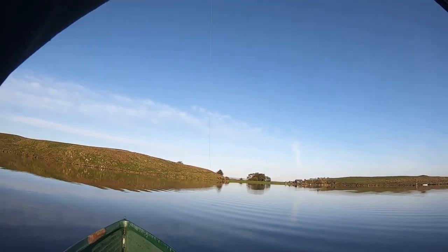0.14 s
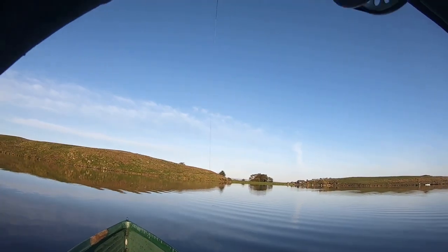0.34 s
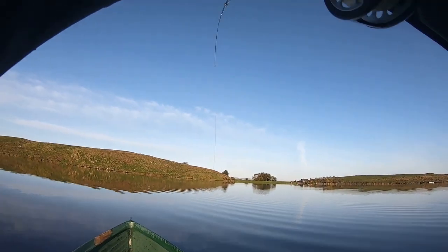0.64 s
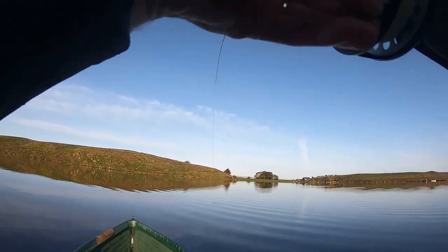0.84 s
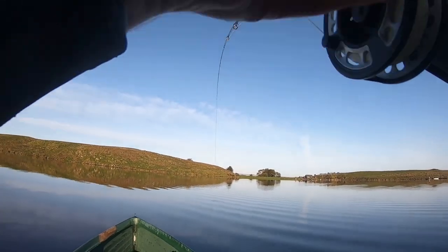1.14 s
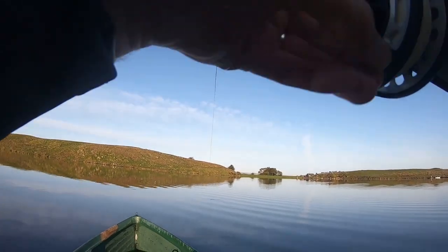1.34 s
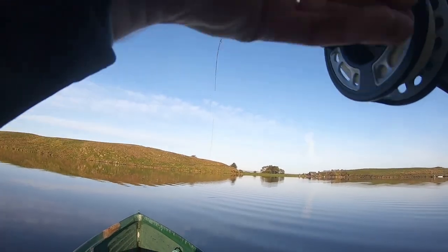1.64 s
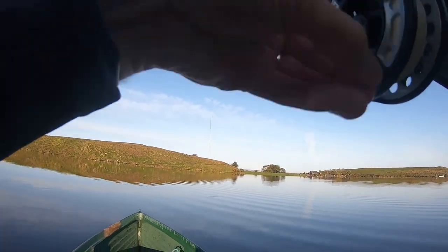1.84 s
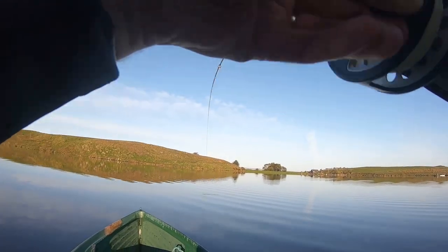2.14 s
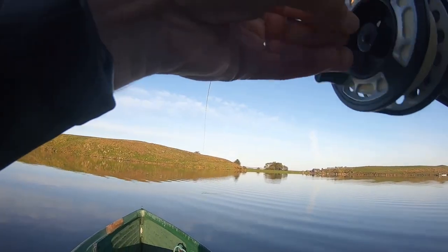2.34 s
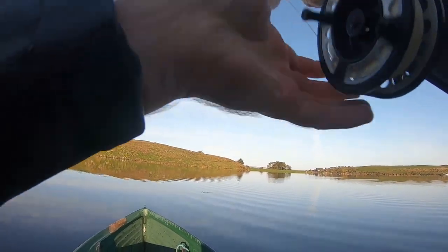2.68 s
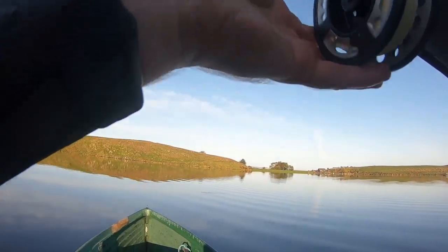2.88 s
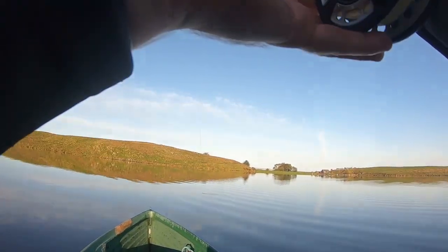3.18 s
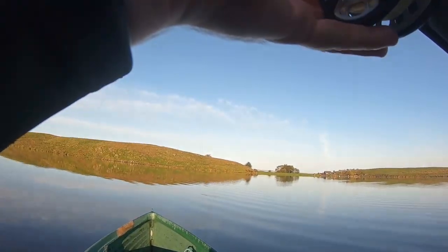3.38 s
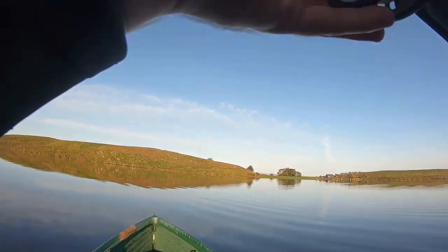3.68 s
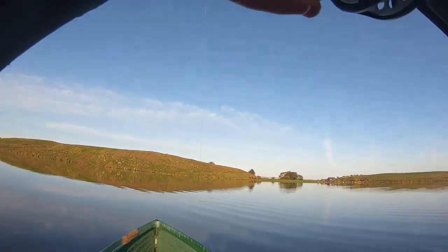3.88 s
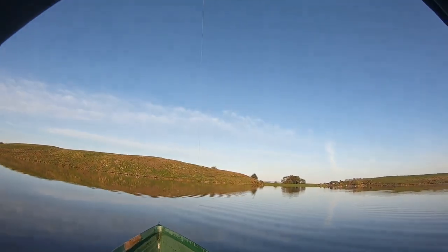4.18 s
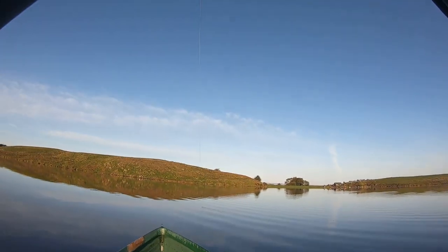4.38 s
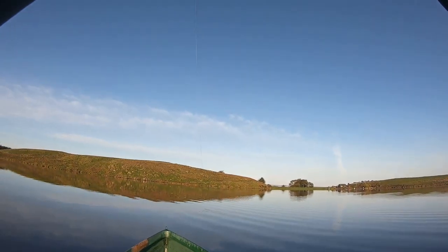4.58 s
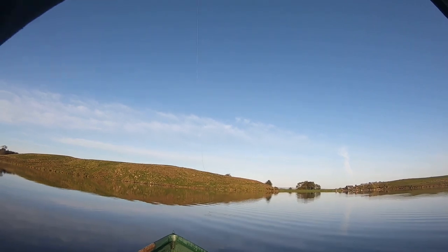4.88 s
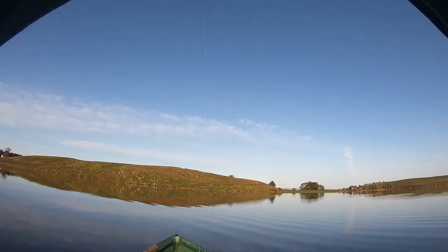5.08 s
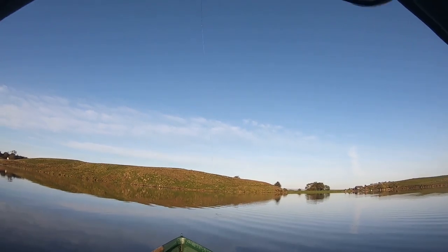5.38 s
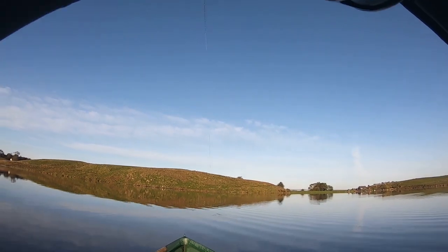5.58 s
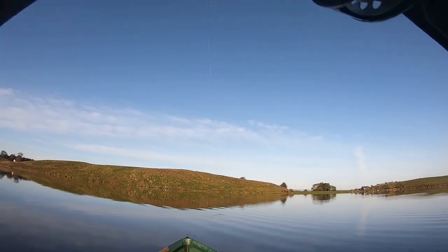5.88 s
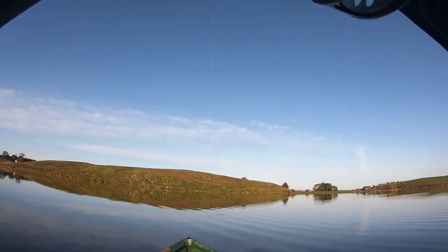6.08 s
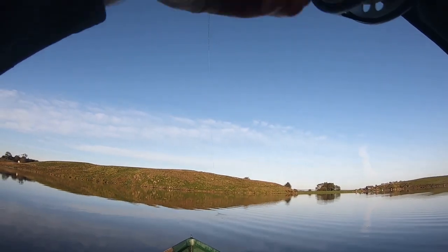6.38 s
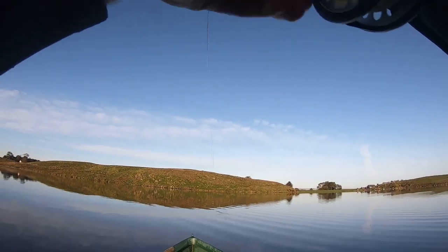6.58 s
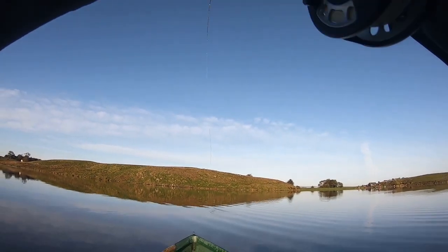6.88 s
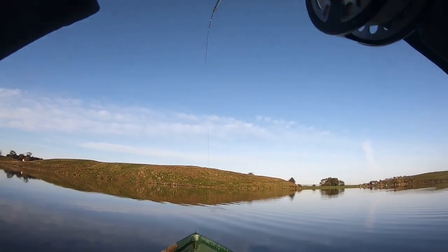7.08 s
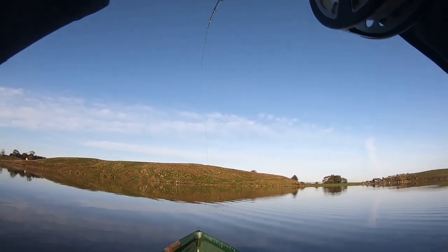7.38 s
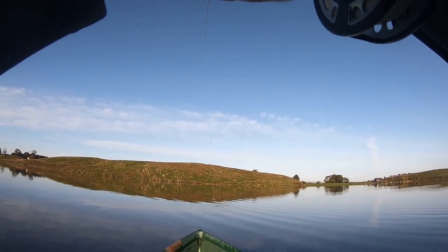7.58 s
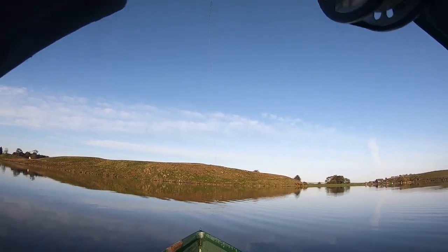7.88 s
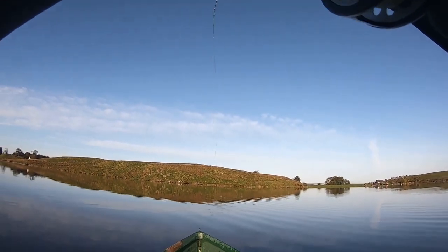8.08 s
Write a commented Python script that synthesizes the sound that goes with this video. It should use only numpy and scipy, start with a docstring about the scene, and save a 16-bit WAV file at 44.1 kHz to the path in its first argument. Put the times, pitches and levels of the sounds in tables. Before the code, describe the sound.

Close up, a fly reel's metallic ratchet clicks in quick pulsing turns, whirrs briefly, pauses, then winds again over a quiet lake with soft boat bumps.

```python
"""Over the quiet of a calm lake, a sleeve rustles and a click-and-pawl fly reel starts, close to the microphone.
It is wound in a small boat in spells of four or five turns a second, each turn running slack once.
Each tooth rings the pawl spring and sets the spool chattering; metal cracks and stray ticks fall between.
After the first spell the spool spins so fast that the clicks fuse into a whirr. The loose handle ticks,
the hull gives soft bumps of low, damped noise, and two faint gliding chirps come from far off."""
import sys
import numpy as np
from scipy import signal
from scipy.io import wavfile

SR = 44100
rng = np.random.default_rng(int(sys.argv[2]) if len(sys.argv) > 2 else 0)


def to_wav(sig):
    """Store sig (one row per channel, or 1-D mono) as 16-bit WAV at the path in sys.argv[1].

    Samples outside -1..1 are clipped; the rate is SR.
    """
    pcm = np.clip(np.atleast_2d(sig), -1, 1) * 32767
    pcm = np.round(pcm).astype(np.int16)
    wavfile.write(sys.argv[1], SR, pcm.T)  # frames by channels


N = 362943
TIME = np.arange(N) / SR
CUTOFF_HZ = 16000  # upper end of the recorded band
CLICK_S = .007  # span over which click levels are reckoned
SPRING_HZ = 3600  # nominal pitch of the pawl spring
# How alike left and right are at the microphone. Each row: frequency in Hz, likeness (1 same, 0 unrelated).
LEFT_RIGHT_LIKENESS = [(200, 0.76), (700, 0.2), (2200, 0.45), (3700, 0.53), (5500, 0.45), (9000, -0.2)]


def from_db(db):
    """Decibels to gain."""
    return 10 ** (np.asarray(db) / 20)


def rms_one(x):
    """Scale to rms 1."""
    return x / np.sqrt(np.mean(x ** 2) + 1e-20)


def unit_energy(x):
    """Scale to energy 1."""
    return x / np.sqrt(np.sum(x ** 2) + 1e-20)


def in_time(rows):
    """The columns of a curve at every sample."""
    s, *columns = np.transpose(rows)
    return [np.interp(TIME, s, c) for c in columns]


def at_hz(points, hz):
    """Read a spectrum on a log-frequency axis."""
    point_hz, values = np.transpose(points)
    return np.interp(np.log(hz), np.log(point_hz), values)


def add(out, s, sound):
    """Mix a short sound in at time s."""
    start = int(np.clip(round(s * SR), 0, N - 1))
    out[..., start:start + sound.shape[-1]] += sound[..., :N - start]


def high_pass(x, hz):
    """Take away the bass below hz."""
    return signal.sosfilt(signal.butter(2, hz, "high", fs=SR, output="sos"), x)


def drift(rate):
    """A slow random wander through `rate` chance values a second."""
    knots = rng.standard_normal(2000)
    return np.interp(TIME * rate, np.arange(len(knots)), knots)


def resonate(x, hz, width_hz):
    """A resonance with gain 1 on top."""
    r = np.exp(-np.pi * width_hz / SR)
    feed = np.array([1, 0, -1]) * (1 - r * r) / 2
    feedback = [1, -2 * r * np.cos(2 * np.pi * hz / SR), r * r]
    return signal.lfilter(feed, feedback, x + 1e-18)


def stereo(mid, side, likeness):
    """Two unrelated signals to left and right of a given likeness."""
    c = np.clip(likeness, -1, 1)
    return np.sqrt(1 + c) * mid + np.sqrt(1 - c) * side * np.array([[1], [-1]])


def banded_noise(spectrum, patchy_db, flicker_rate):
    """Half-octave bands of stereo noise, each flickering on its own; rms 1."""
    out, white = 0, rng.standard_normal((2, 2, N))
    top_hz = min(spectrum[-1][0], CUTOFF_HZ)
    edges = 2 ** np.arange(np.log2(spectrum[0][0]), np.log2(top_hz) + 1 / 4, .5)
    for k, (low, high) in enumerate(zip(edges, edges[1:])):
        band = signal.butter(2, [low, high], "band", fs=SR, output="sos")
        mid, side = signal.sosfilt(band, white[k % 2])
        hz = np.sqrt(low * high)
        level = from_db(at_hz(spectrum, hz) + patchy_db * drift(flicker_rate))
        out = out + level * stereo(mid, side, at_hz(LEFT_RIGHT_LIKENESS, hz))
    return rms_one(out)


def lake():
    """Water and air around the hull: low noise whose bands flicker."""
    # Each row: start in seconds, level in dB before a common gain.
    lake_level = [(0.0, -61), (3.92, -65.5), (5.82, -60), (8.23, -66)]
    # Each row: frequency in Hz, level in dB per Hz before scaling.
    lake_colour = [(25, -9), (110, -21), (160, -2.5), (260, -4), (600, -12.5), (1800, -19.5)]
    level_db, = in_time(lake_level)
    return from_db(level_db + 2.0) * banded_noise(lake_colour, patchy_db=4.0, flicker_rate=15)


def sleeve():
    """Sleeve and line rustle: noise whose bands flicker fast."""
    # Each row: time in seconds, level in dB before a common gain.
    rustle_level = [(0, -55), (0.25, -54), (2.27, -55.5), (3.22, -66), (3.45, -72), (3.72, -66),
                    (3.85, -57), (4.02, -59), (4.1, -54), (4.2, -70), (4.28, -54), (4.45, -60.5),
                    (4.6, -59.5), (7.45, -58.5), (7.6, -68.5), (7.8, -62.5)]
    # Each row: frequency in Hz, level in dB per Hz before scaling.
    rustle_colour = [(300, -9), (850, -4), (1500, -5), (4200, -10), (7500, -14.5), (9700, -3.5),
                     (15000, -37)]
    level_db, = in_time(rustle_level)
    return from_db(level_db + 3.0) * banded_noise(rustle_colour, patchy_db=4.5, flicker_rate=40)


def chatter(t60, bounce_db, tail_db, crack_db=0, crack_t60=0.00088, bounce_s=.0026, attack_s=.00005):
    """A contact cracks, dissolves in tiny impacts, rebounds once and leaves a faint tail; energy near 1 each way."""
    t = TIME[:SR // 25]
    late = t - bounce_s * rng.uniform(0.29, 1.5)
    rebound_db = bounce_db + 2 * rng.standard_normal() - 60 * np.abs(late) / t60
    rebound = (late > 0) * from_db(rebound_db)
    crack = from_db(crack_db - 60 * t / crack_t60)
    impacts = from_db(-60 * t / t60)
    tail = from_db(tail_db - 60 * t / .06)
    power = crack ** 2 + impacts ** 2 + rebound ** 2 + tail ** 2
    envelope = unit_energy(np.sqrt(power) * (1 - np.exp(-t / attack_s)))
    return envelope * rng.standard_normal((2, len(t)))


def spool(drive, low_cut_hz=900):
    """Spool and frame resonate under a two-way (mid, side) drive; a white drive roughly keeps its power."""
    # Each row: resonance in Hz, width in Hz, relative level in dB.
    spool_modes = [(990, 1500, -13), (1543, 54, 0), (2006, 316, -3), (3420, 1200, 2), (4496, 460, 4.5),
                   (5380, 570, 0.5), (6514, 630, 2), (7360, 660, -1.5), (8710, 340, 0.5), (9330, 470, 6.5),
                   (9640, 940, 6), (13600, 3500, -6.5)]
    out, power = 0, 0
    for k, (hz, width_hz, db) in enumerate(spool_modes):
        mid, side = resonate(drive, hz, width_hz)
        mode = stereo(mid, side, at_hz(LEFT_RIGHT_LIKENESS, hz))
        out = out + (-1) ** k * from_db(db) * mode
        power += from_db(db) ** 2 * np.pi * width_hz / SR
    # so small a body radiates little bass
    return high_pass(out, low_cut_hz) / np.sqrt(power)


def spring_ring(hz, rattle_db, rattle_t60):
    """The pawl snaps down and rattles; its spring rings a little differently on every tooth; energy 1."""
    # Each row: nominal resonance in Hz, width in Hz, relative level in dB before chance.
    spring_modes = [(2200, 300, -15.5), (2800, 500, -13), (3340, 360, -2.5), (3620, 210, 2)]
    t = TIME[:SR // 50]
    rattle = unit_energy(from_db(-60 * t / rattle_t60)) * rng.standard_normal(len(t))
    snap = signal.unit_impulse(len(t)) + from_db(rattle_db) * rattle
    stretch = hz / SPRING_HZ * (1 + .021 * np.clip(rng.standard_normal(), -2, .9))
    strengths = from_db(2 * rng.standard_normal(len(spring_modes)))
    ring = np.zeros(len(t))
    for k, (mode_hz, width_hz, db) in enumerate(spring_modes):
        ring += (-1) ** k * from_db(db) * strengths[k] * resonate(snap, mode_hz * stretch, width_hz)
    return unit_energy(ring)


def winding(teeth):
    """Each tooth scrapes under the pawl, then lets it snap down: the spring rings and the spool chatters."""
    spring_db, spool_db = 0.26, -0.74  # trims
    slide_db, slide_s = -46, 0.0042  # the scrape starts this long before the snap
    rim_hz, rim_width_hz, rim_db = 9750, 700, 4.0
    rings, drive, size = np.zeros(N), np.zeros((2, N)), np.sqrt(CLICK_S * SR)
    scrape = unit_energy(np.hanning(SR // 220))
    for s, ring_db, chatter_db, hz in teeth:
        ring = spring_ring(hz, rattle_db=-4, rattle_t60=.012)
        add(rings, s, size * from_db(ring_db + spring_db) * ring)
        burst = chatter(t60=0.013, bounce_db=-2.0, tail_db=-9.5, crack_db=0.5)
        # on a slack spool the spring barely rings and the blow sets the rim singing instead
        slack = np.clip((chatter_db - ring_db) / 10, 0, 1)
        burst = burst + slack * from_db(rim_db) * resonate(burst, rim_hz, rim_width_hz)
        add(drive, s, size * from_db(chatter_db + spool_db) * burst)
        slide = scrape * rng.standard_normal((2, len(scrape)))
        add(drive, s - slide_s, size * from_db(slide_db) * slide)
    return high_pass(rings, 1500) + spool(drive)


def thud(hz, width_hz, t60, attack_s):
    """A soft blow: a push that builds and dies into a broad resonance, with the treble gone; peak 1."""
    t = TIME[:SR // 3]
    push = rng.standard_normal(len(t)) * (1 - np.exp(-t / attack_s)) * from_db(-60 * t / t60)
    sound = resonate(push, hz, width_hz)
    sound = signal.sosfilt(signal.butter(4, hz + width_hz / 2, fs=SR, output="sos"), sound)
    return sound / np.abs(sound).max()


def hull():
    """Soft blows on the hull: dull bumps and one light hollow knock."""
    # Each row: start in seconds, peak in dB before a common gain, pitch in Hz.
    hull_bumps = [(.312, -50, 150), (1.272, -43, 285), (2.308, -44, 190), (2.507, -46, 190),
                  (2.94, -48, 330), (4.507, -42, 125), (5.512, -48, 240), (6.492, -42, 251),
                  (6.532, -47, 125)]
    # Each row: start in seconds, peak in dB, pitch in Hz.
    hollow_knock = [(4.058, -33, 942)]
    bump_db, width_per_hz = 4.5, 0.78
    out = np.zeros(N)
    for s, db, hz in hull_bumps:
        add(out, s, from_db(db + bump_db) * thud(hz, width_hz=width_per_hz * hz, t60=0.13, attack_s=0.016))
    for s, db, hz in hollow_knock:
        add(out, s, from_db(db) * thud(hz, width_hz=hz / 2, t60=.022, attack_s=.0005))
    return out


def tooth_times(start, end, count, ease):
    """Teeth passing in one part of a turn, while the spool gathers or loses speed."""
    part = np.arange(round(count)) / round(count)
    return start + (end - start) * (part + ease * part * (1 - part))


def turning_teeth():
    """Every tooth of the turns: a slack spool chatters, one pushed then pulled by the hand rings the spring."""
    # Each row: start of slack, of push and of pull in seconds, teeth passing slack, pushed and pulled,
    # spring ring at the bite, in mid turn and at the end in dB before chance and trim.
    handle_turns = [(0.468, 0.525, 0.588, 2, 3, 6, -28.5, -31, -21),
                    (0.692, 0.766, 0.873, 5, 6, 6, -33.5, -26.5, -25),
                    (0.967, 1.035, 1.155, 4, 8, 3, -28.5, -23.5, -25.5),
                    (1.218, 1.284, 1.399, 4, 7, 3, -28, -29, -27.5),
                    (1.459, 1.538, 1.676, 5, 8, 3, -26, -25.5, -26.5),
                    (1.728, 1.81, 1.926, 4, 8, 3, -28, -26, -26),
                    (1.981, 2.049, 2.156, 4, 7, 3, -31.5, -24.5, -23.5),
                    (4.839, 4.864, 4.955, 1, 4, 8, -30.5, -32.5, -30),
                    (5.071, 5.095, 5.159, 1, 4, 9, -27.5, -30, -26.5),
                    (5.273, 5.324, 5.412, 3, 6, 6, -32.5, -30, -27.5),
                    (5.493, 5.527, 5.656, 2, 9, 4, -29.5, -28.5, -26),
                    (5.71, 5.756, 5.847, 3, 6, 6, -22, -31, -24.5),
                    (5.929, 5.975, 6.03, 3, 4, 7, -23, -31, -26),
                    (6.137, 6.174, 6.286, 2, 8, 5, -23.5, -31, -24.5),
                    (6.345, 6.386, 6.489, 2, 7, 6, -29, -29.5, -25.5),
                    (6.559, 6.592, 6.67, 2, 5, 8, -27.5, -26.5, -24),
                    (6.765, 6.821, 6.894, 3, 5, 8, -30.5, -30, -24.5),
                    (6.983, 7.019, 7.071, 2, 3, 9, -25.5, -32.5, -22.5),
                    (7.198, 7.233, 7.308, 2, 5, 8, -28.5, -28, -26.5),
                    (8.013, 8.036, 8.108, 1, 4, 3, -33, -28.5, -28)]
    # When the hand halts, in seconds.
    hand_stops = [2.2116, 7.4055, 8.1615]
    # How much the spool gathers speed through slack, push and pull, as a share (negative: it slows).
    speed_gain = [.06, .03, -.07]
    # Each row: time in seconds, spool chatter while slack and while driven in dB before chance and trim.
    chatter_level = [(2.2, -26, -30), (4.8, -26.5, -29.5)]
    slack_ring_db = -52.5
    ring_spread_db, chatter_spread_db = 1.47, 2.3  # from tooth to tooth
    rows, breaks = [], [turn[0] for turn in handle_turns] + hand_stops
    chatter_s, *levels = np.transpose(chatter_level)
    for turn in handle_turns:
        starts, counts, ring_db = turn[:3], turn[3:6], turn[6:]
        ends = [*starts[1:], min(s for s in breaks if s > starts[-1])]
        slack, push, pull = map(tooth_times, starts, ends, counts, speed_gain)
        slack_db, taut_db = (np.interp(starts[0], chatter_s, db) for db in levels)
        rows += [(s, slack_ring_db, slack_db) for s in slack]
        taut = np.concatenate([push, pull])
        rings = np.interp(np.linspace(0, 2, len(taut)), [0, 1, 2], ring_db)
        rows += [(s, db, taut_db) for s, db in zip(taut, rings)]
    teeth = []
    for (s, ring, chat), (a, b) in zip(rows, rng.standard_normal((len(rows), 2))):
        teeth.append((s, ring + ring_spread_db * a, chat + chatter_spread_db * b, SPRING_HZ))
    return teeth


def stray_ticks(teeth, share=0.41, tick_db=-37):
    """The spool has play on its spindle: now and then it ticks once more shortly after a tooth."""
    drive = np.zeros((2, N))
    for (s, *_), (chance, place) in zip(teeth, rng.random((len(teeth), 2))):
        tick = chatter(t60=0.005, bounce_db=-28.0, tail_db=-18.5)
        if chance < share:
            add(drive, s + CLICK_S * (.5 + place), np.sqrt(CLICK_S * SR) * from_db(tick_db) * tick)
    return spool(drive)


def cracks(bright_hz=6500, bright_width_hz=4000, bright_db=3.5):
    """The loose spool hits its frame: metal meets metal once, dry, with almost no chatter."""
    # Each row: start in seconds, drive level in dB over CLICK_S before the bright resonance.
    frame_hits = [(1.887, -21), (2.18, -25), (6.7975, -21), (7.322, -26)]
    drive = np.zeros((2, N))
    for s, db in frame_hits:
        hit = chatter(t60=0.0022, bounce_db=-29.5, tail_db=-30)
        add(drive, s, np.sqrt(CLICK_S * SR) * from_db(db) * hit)
    return spool(from_db(bright_db) * resonate(drive, bright_hz, bright_width_hz))


def handle(rattle_db=9, rim_db=-3):
    """The handle rattles on its pin: light metal ticks that leave the rim ringing."""
    # Each row: start in seconds, level in dB before the rattle and rim gains.
    handle_ticks = [(2.2174, -11.5), (3.5326, -25.5), (3.8152, -23.5), (3.8728, -22.5), (4.0806, -25),
                    (4.2185, -34), (4.232, -31), (4.2666, -38), (4.286, -25), (4.3233, -29.5),
                    (4.419, -24.5), (4.5326, -17.5)]
    # Handle and rim. Each row: pitch in Hz, relative level in dB before chance, 60 dB decay in seconds.
    rim_modes = [(4950, -19.5, 0.027), (7170, -20, 0.046), (8750, -22.5, 0.043), (9600, -25, 0.037)]
    drive, rings, t = np.zeros((2, N)), np.zeros((2, N)), TIME[:SR // 5]
    for s, db in handle_ticks:
        add(drive, s, from_db(db + rattle_db) * chatter(t60=0.019, bounce_db=1.5, tail_db=-24))
        for hz, mode_db, t60 in rim_modes:
            # left and right differ by chance
            strength = from_db(db + rim_db + mode_db + rng.normal(0, 2.3, (2, 1)))
            add(rings, s, strength * np.sin(2 * np.pi * hz * t) * from_db(-60 * t / t60))
    return spool(drive) + rings


def spinning(speed, level_db, db_per_octave=5.5):
    """Teeth pass at the spool's speed, louder when faster; like bursts fuse into a rough whirr."""
    rasp_hz, rasp_width_hz, rasp_db = 6200, 1500, 7.0
    rim_hz, rim_width_hz, rim_db = 8660, 320, 1.0
    # the hand bears hardest on the spool as it sets it spinning
    shove_s, shove_length_s, shove_db = 2.51, 0.06, 2.5
    # the free spool runs a little out of true and swells once a turn
    teeth_per_turn, swell_db, loudest_tooth = 16, 1, 15.8
    memory = .8  # how far each burst resembles the one before
    rate, = in_time(speed)
    turning = (TIME > speed[0][0]) & (TIME < speed[-1][0])
    teeth = np.flatnonzero(np.diff(np.floor(np.cumsum(rate * turning) / SR)))
    drive, burst = np.zeros((2, N)), 0
    for k, i in enumerate(teeth, 1):
        # the contact changes little by little as the spool goes round
        fresh = chatter(t60=.015, bounce_db=-6, tail_db=-18)
        burst = memory * burst + np.sqrt(1 - memory ** 2) * fresh
        # level_db holds at 200 teeth a second
        db = level_db + db_per_octave * np.log2(rate[i] / 200) + rng.standard_normal()
        db += swell_db * np.cos(2 * np.pi * (k - loudest_tooth) / teeth_per_turn)
        db += shove_db * np.exp(-((i / SR - shove_s) / shove_length_s) ** 2)
        add(drive, i / SR, np.sqrt(SR / rate[i]) * from_db(db) * burst)
    # the pawl only skims the tips of the teeth, which brings out the upper middle resonances and the rim
    rasp = from_db(rasp_db) * resonate(drive, rasp_hz, rasp_width_hz)
    rim = from_db(rim_db) * resonate(drive, rim_hz, rim_width_hz)
    return spool(drive + rasp + rim, low_cut_hz=590)


def fast_spins():
    """A short flick of the spool, then the long spin."""
    # Each row: time in seconds, teeth per second.
    flick_speed = [(2.316, 128), (2.36, 90), (2.385, 40)]
    # Each row: time in seconds, teeth per second.
    spin_speed = [(2.431, 67.6), (2.47, 190.2), (2.51, 219.2), (2.535, 222.1), (2.56, 134.3),
                  (2.585, 163.2), (2.63, 210.2), (2.68, 253.1), (2.74, 268.0), (2.8, 292.2), (2.86, 267.6),
                  (2.89, 188.5), (2.94, 138.3), (3.02, 118.5), (3.09, 95.9), (3.13, 67.9), (3.17, 32.9)]
    return spinning(flick_speed, level_db=-32.5) + spinning(spin_speed, level_db=-33)


def facing(reel_sound, edge_hz=7000):
    """The top treble is beamed, so it changes as the reel is held nearer the microphone or turned."""
    # Each row: time in seconds, top treble gain in dB, its left-right balance in dB.
    reel_facing = [(2.2, 1, 2), (3.1, 7, 3.5), (4.7, -0.5, 2)]
    top_db, balance_db = in_time(reel_facing)
    top = signal.sosfiltfilt(signal.butter(4, edge_hz, "high", fs=SR, output="sos"), reel_sound)
    gain = from_db(top_db + balance_db * np.array([[.5], [-.5]]))
    return reel_sound + top * (gain - 1)


def reel():
    """The whole reel close to the microphone: wound, rattling, cracking and spun."""
    # Lone clicks as the spool creeps or halts. Each row: start in seconds, ring of the pawl spring in dB
    # and chatter of the spool in dB, both before trim, nominal pitch of the ring in Hz.
    lone_clicks = [(.272, -31.5, -30.5, 3150), (.328, -35, -25, 5700), (.362, -37, -25.5, 4560),
                   (.388, -36, -28, 5460), (.41, -35, -28, 5150), (.435, -32, -28.5, 5220),
                   (2.213, -55, -22.5, 3600), (2.316, -33, -31.5, 2160), (2.395, -40.5, -41, 3550),
                   (2.431, -48, -38.5, 3600), (4.686, -31, -30, 2690), (4.72, -32, -26.5, 4700),
                   (4.751, -32.5, -24.5, 4800), (4.785, -32.5, -25.5, 4800), (4.813, -32, -25, 4150),
                   (7.407, -27, -39.5, 3570), (7.732, -55, -68, 3860), (7.827, -32.5, -31.5, 3770),
                   (7.861, -36, -28.5, 5750), (7.893, -31.5, -26.5, 3560), (7.92, -33, -24.5, 3640),
                   (7.945, -22, -35, 3430), (7.959, -33, -26, 5940), (7.973, -29, -30, 3430),
                   (8.163, -27, -31.5, 3680), (8.195, -27.5, -27.5, 3560), (8.217, -31.5, -26.5, 4600)]
    teeth = turning_teeth()
    wound = winding(teeth + lone_clicks) + stray_ticks(teeth)
    return facing(wound + cracks() + handle() + fast_spins())


def bird():
    """Faint chirps, probably a far bird: short, nearly pure glides that swell and fade."""
    # Each row: start in seconds, length in seconds, first pitch in Hz, last pitch in Hz, peak in dB.
    far_chirps = [(3.436, .045, 3650, 4500, -63), (7.772, .06, 5400, 3950, -62)]
    out = np.zeros(N)
    for s, length_s, first_hz, last_hz, db in far_chirps:
        hz = np.geomspace(first_hz, last_hz, int(length_s * SR))
        tone = np.sin(2 * np.pi * np.cumsum(hz) / SR)
        add(out, s, from_db(db) * np.hanning(len(hz)) * tone)
    return out


def scene():
    """The reel, hull and far bird over the quiet of the lake."""
    return lake() + sleeve() + reel() + hull() + bird()


def record(dry, port_hz=10800, top_db=-8.0):
    """The microphone ports lose some of the top treble; the band ends steeply."""
    below = signal.sosfiltfilt(signal.butter(8, port_hz, fs=SR, output="sos"), dry)
    heard = below + from_db(top_db) * (dry - below)
    return signal.sosfilt(signal.ellip(10, .2, 80, CUTOFF_HZ, fs=SR, output="sos"), heard)


dry = scene()
out = record(dry)
to_wav(out)
```